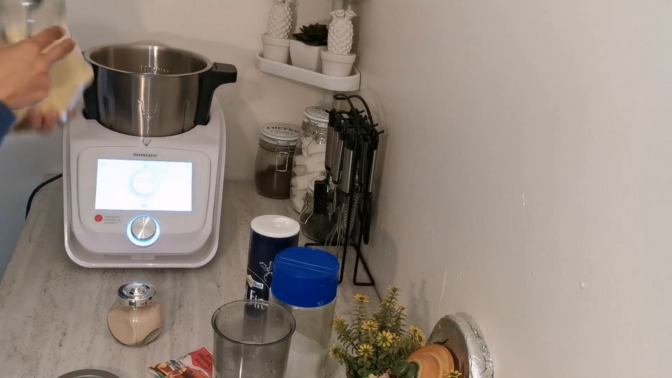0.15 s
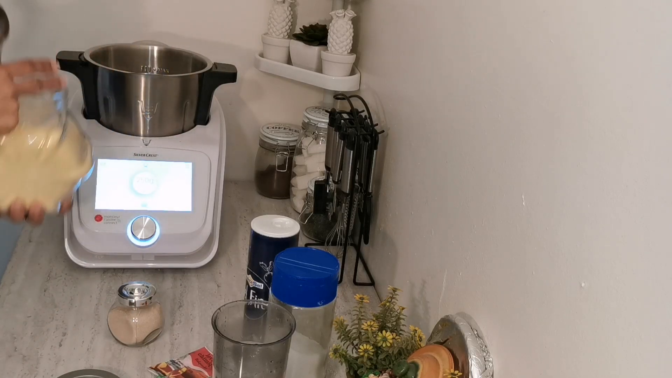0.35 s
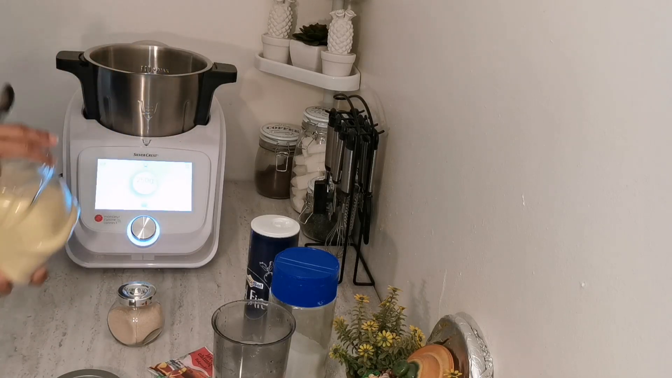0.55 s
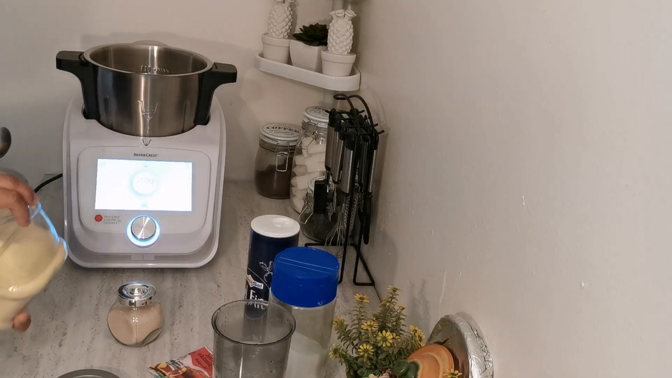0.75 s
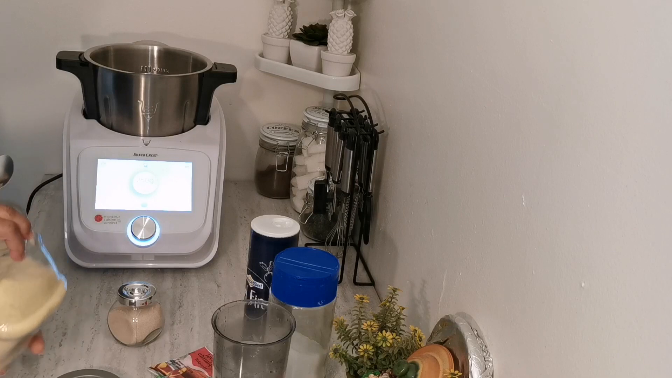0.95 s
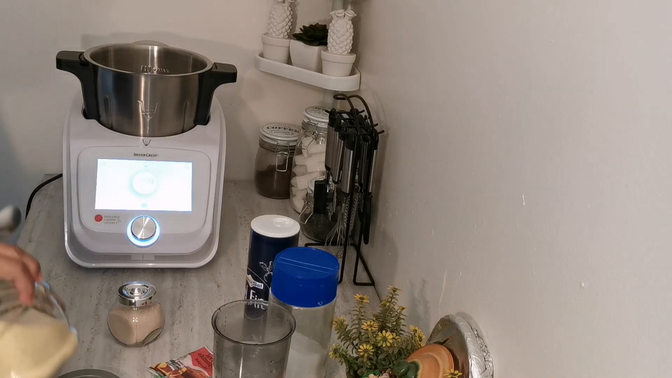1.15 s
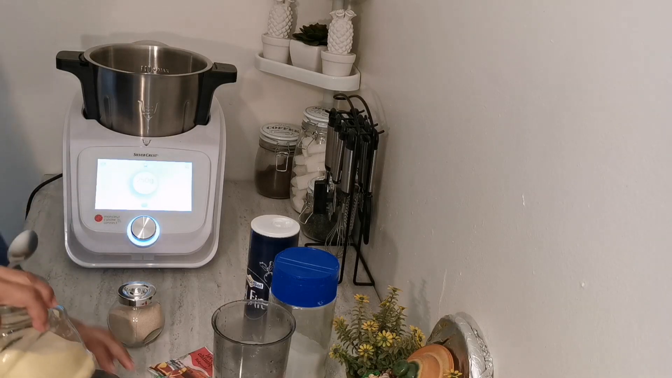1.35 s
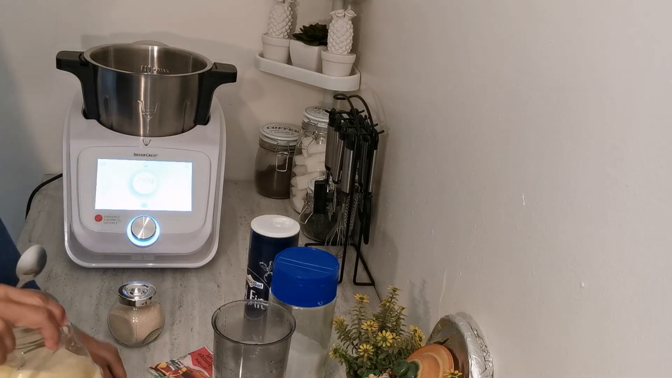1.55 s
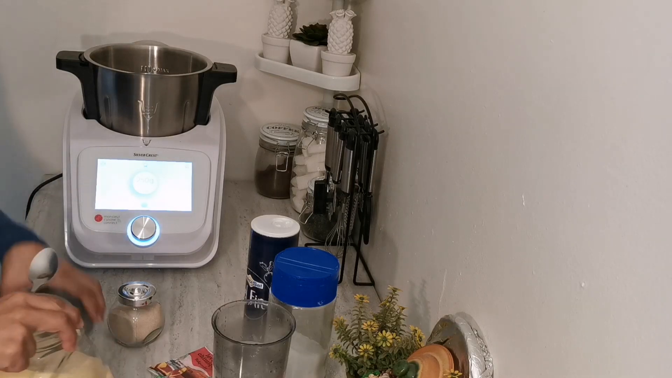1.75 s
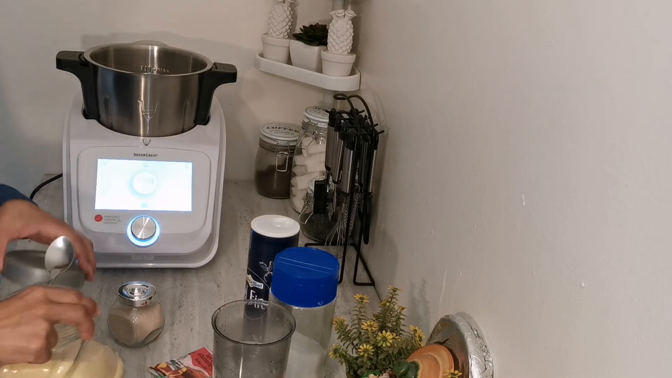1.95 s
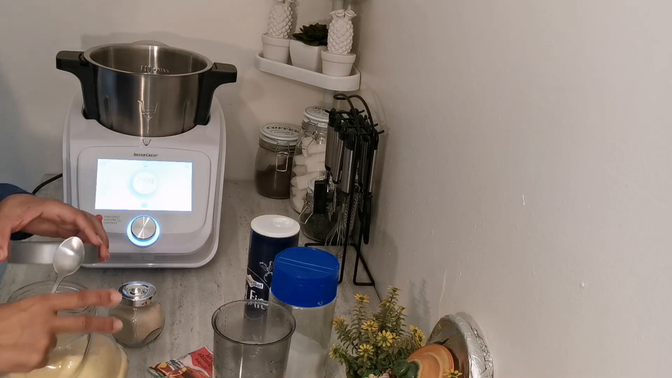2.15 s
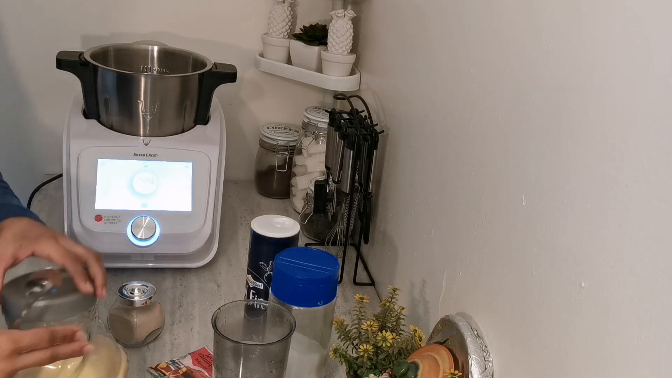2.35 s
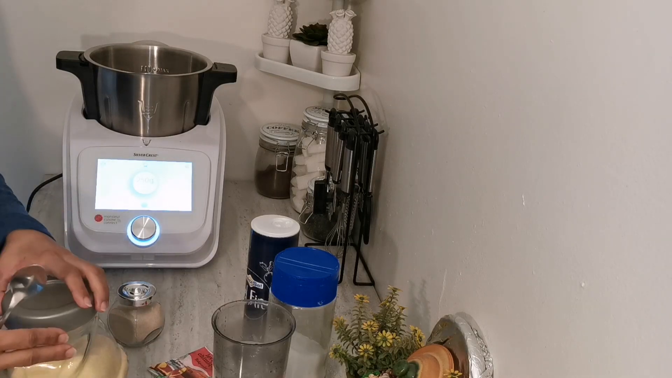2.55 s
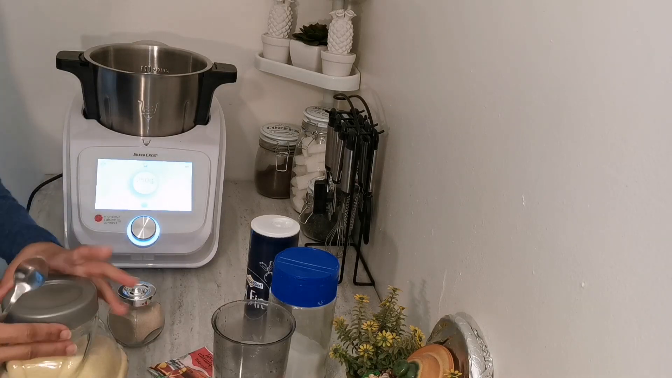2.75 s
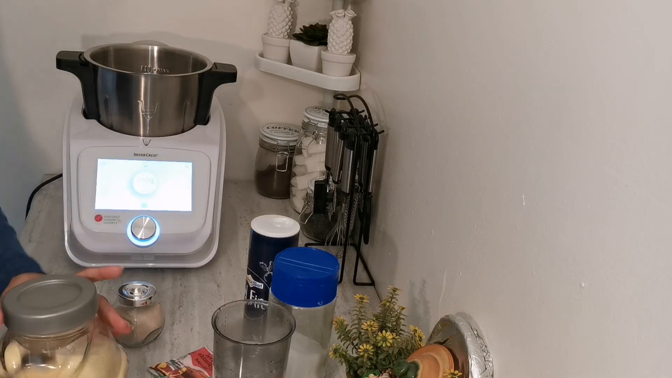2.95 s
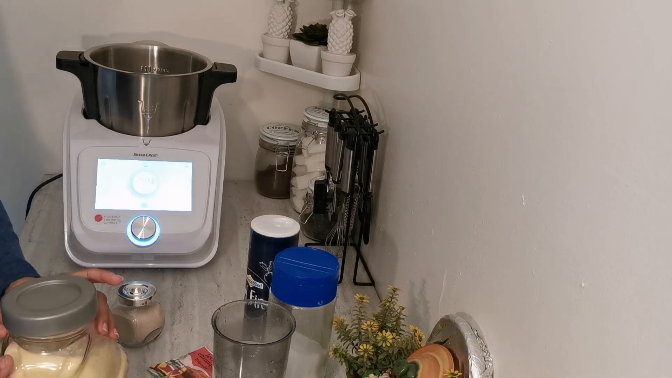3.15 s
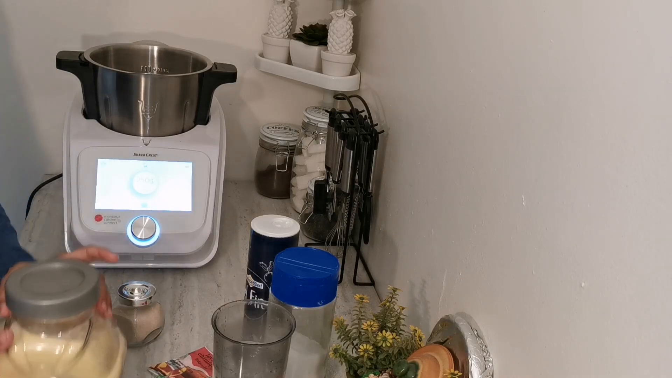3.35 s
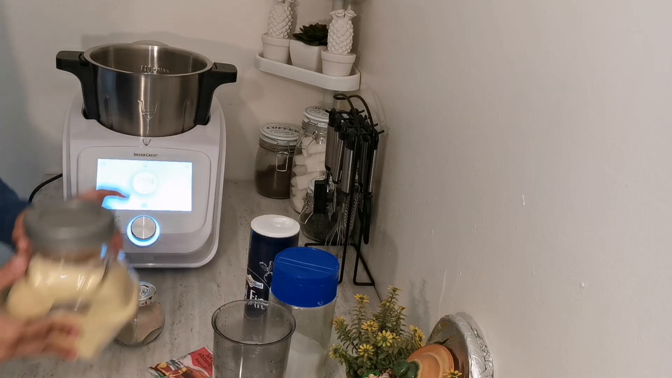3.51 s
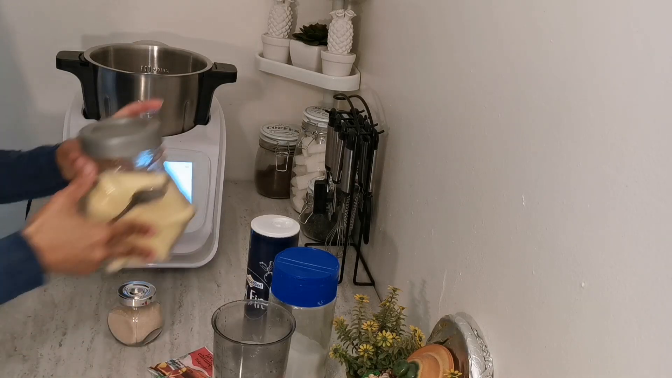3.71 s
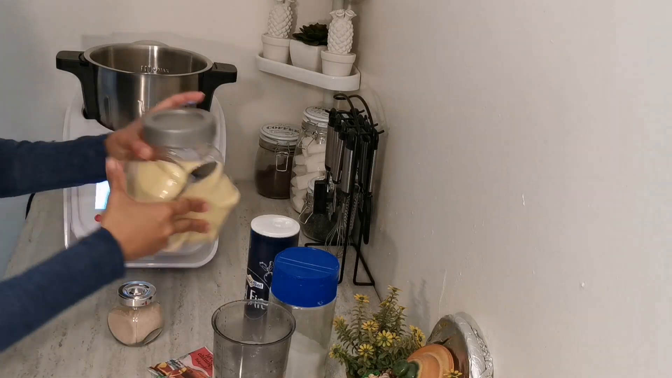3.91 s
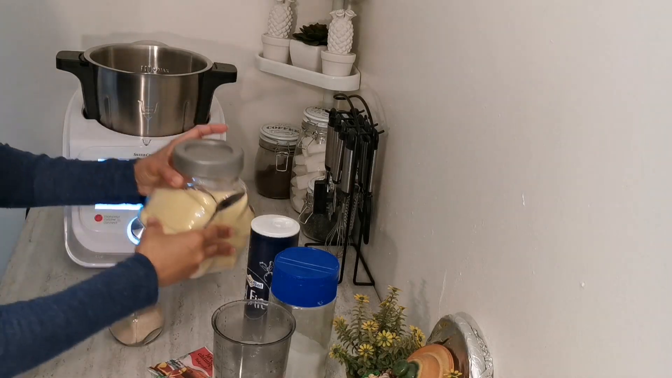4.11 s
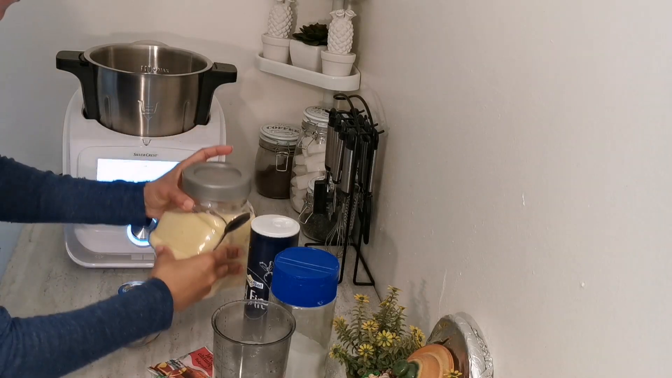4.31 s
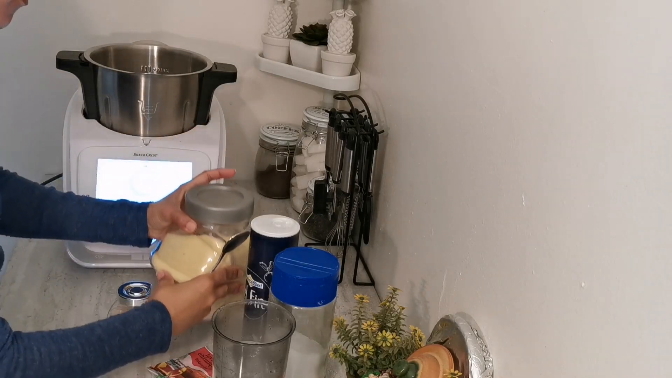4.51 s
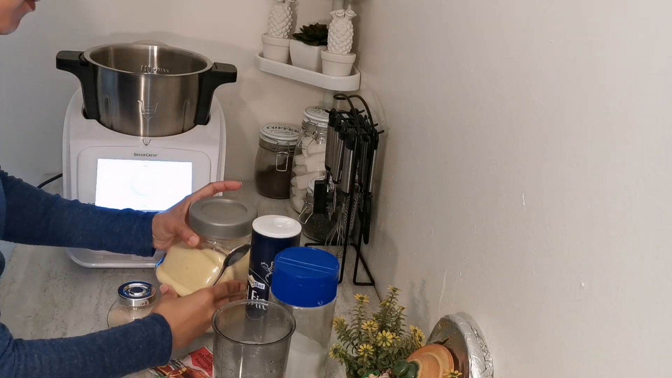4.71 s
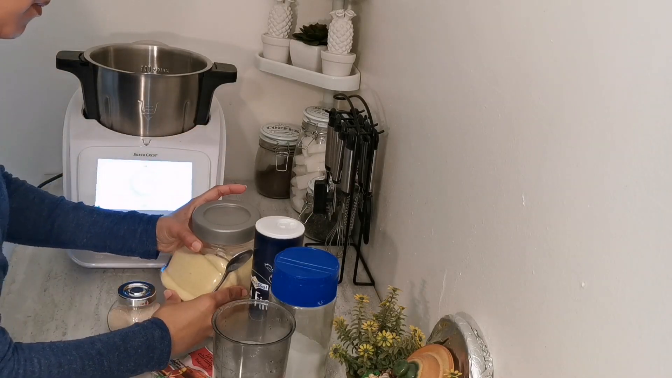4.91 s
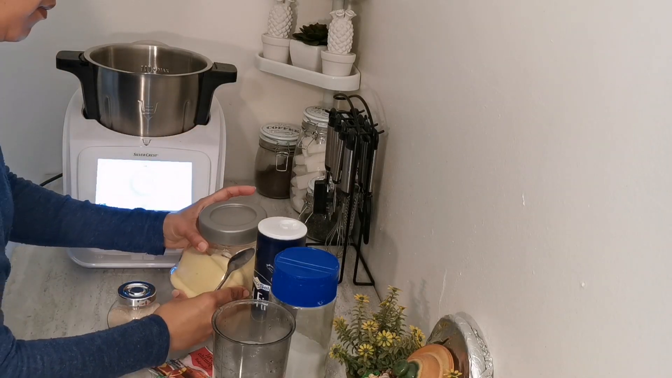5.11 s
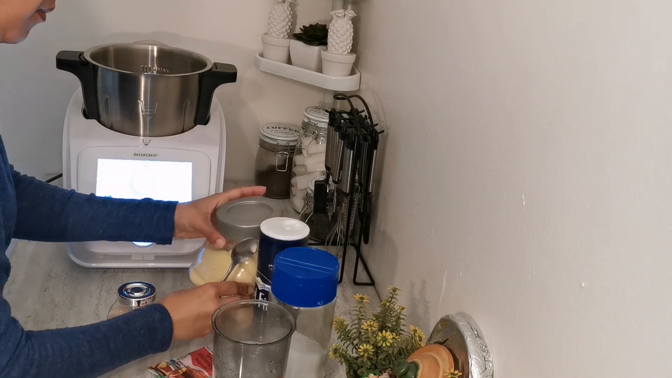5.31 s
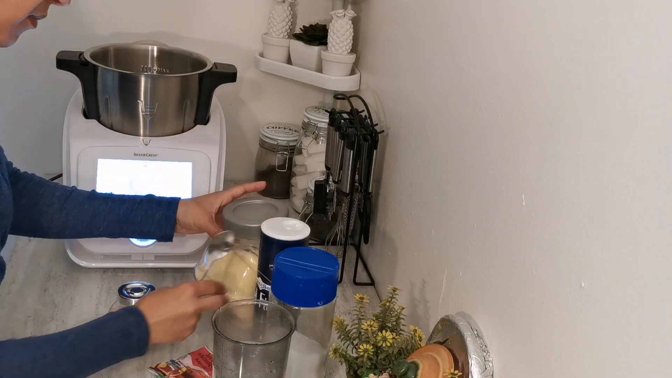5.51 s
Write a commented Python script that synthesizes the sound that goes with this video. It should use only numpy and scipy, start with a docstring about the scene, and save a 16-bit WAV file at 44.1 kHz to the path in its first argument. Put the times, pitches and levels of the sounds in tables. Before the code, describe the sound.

A spoon clinks lightly on a glass jar, then a thin lid taps against the rim. The heavy jar lands on the worktop with dull thuds, rocks and scrapes, amid more spoon and lid clicks. After a lull with faint sleeve rustle, the jar is set down again with a firm knock and slid along. Appliances hum softly throughout the small, slightly ringing kitchen, and the handling sounds nearby, a little to the left.

```python
"""Glass jar on a kitchen worktop.

A heavy jar is set down, rocked, slid and leant on: blows ring the worktop's modes, friction rumbles
and hisses. The lid taps the rim; a spoon clinks on glass and lid. The small tiled kitchen rings briefly.
Appliances hum throughout; sleeves rustle faintly while the jar is carried."""
import sys
import numpy as np
from scipy import signal
from scipy.fft import rfft, irfft, next_fast_len
from scipy.io import wavfile
from scipy.ndimage import map_coordinates

SR = 44100
rng = np.random.default_rng(int(sys.argv[2]) if len(sys.argv) > 2 else 0)


def int16_out(signal):
    """Quantize to a 16-bit WAV file."""
    q = np.round(np.clip(np.atleast_2d(signal).T, -1, 1) * 32767)
    wavfile.write(sys.argv[1], SR, q.astype(np.int16))


N = 245637

# kitchen reverberation (frequency [Hz], t60 [s], relative level [dB])
ROOM_BANDS = [(60, 0.65, -14), (225, 0.33, -6.5), (577, 0.35, -4.5), (1520, 0.42, 1.5), (4000, 0.41, 0),
              (12000, 0.35, -5.5)]
# diffuse sound (frequency [Hz], left-right correlation [1])
COHERENCE = [(60, 0.77), (250, 0.79), (600, 0.29), (1500, 0.033), (5000, 0.053)]
# room tone spectra (frequency [Hz], relative density [dB])
APPLIANCE_SPECTRUM = [(12, -31.5), (20, -1), (75, -5.5), (108, 1), (150, -6.5), (168, -10.5), (204, -6),
                      (274, -16.5), (298, -11.5), (434, -32), (511, -42), (612, -31), (1000, -37),
                      (1300, -32.5), (2200, -120)]
HISS_SPECTRUM = [(240, -29.5), (400, -12), (519, -4), (568, -10.5), (748, -9), (820, -7), (1130, -15.5),
                 (1680, -10.5), (2180, -13), (2350, -15), (4900, -18.5), (7190, -26), (15400, -28)]

# spoon on glass, then on lid (time [s], blow [dB], chatter re blow [dB])
SPOON_CLINKS = [(0.7212, -38, 6.5), (2.263, -41, 18.5)]
# modes rung by the spoon (frequency [Hz], level [dB], t60 [s])
GLASS_MODES = [(618, -16, 0.071), (1475, -18, 0.033), (2154, -15, 0.042), (2290, -21, 0.023),
               (2850, -14, 0.035), (3410, -6.5, 0.029), (4404, 0.5, 0.045), (4330, -1, 0.044),
               (4400, -23, 0.045), (4710, -1.5, 0.036), (4980, 2.5, 0.025), (5740, -6, 0.023),
               (8170, -14, 0.027), (8310, -1, 0.069), (10730, -15, 0.033)]
STEEL_MODES = [(2040, -16, 0.018), (3400, 4, 0.0059), (4080, -7, 0.015), (4720, -1, 0.03), (5160, 1, 0.06),
               (5270, -4, 0.037), (6460, -12, 0.024), (8110, -1, 0.025), (9060, -3, 0.014),
               (10940, 3.5, 0.038), (12200, -16, .02), (14400, -11, .015)]
# spoon chatter (frequency [Hz], relative density [dB])
GLASS_CHATTER_SPECTRUM = [(180, -49), (300, -7), (1260, -16), (1560, -31), (1840, -23), (2780, -3),
                          (3930, -16), (4790, -2.5), (7110, -9.5), (8110, -2), (9890, -21), (10900, -11),
                          (12900, -9.5), (15400, -34.5)]
STEEL_CHATTER_SPECTRUM = [(1060, -18), (1800, -18), (2190, -7.5), (3470, -12), (3860, -16), (4880, -5),
                          (6000, -11), (8450, -3.5), (9930, -10), (11000, -6.5), (12900, -13),
                          (14300, -13.5), (15400, -46)]

# lid on rim (time [s], blow [dB], tilt [dB/octave], click re blow [dB])
LID_TAPS = [(1.569, -57, -22, -4.5), (1.59, -51, -0.5, -43), (1.6795, -30, 10, -9.5),
            (1.692, -54, -5.5, -13), (1.707, -41, 16, 3.5), (1.734, -59, 9, -12), (2.512, -65.5, -2, 18.5),
            (2.542, -42.5, -7.5, 4), (2.557, -45, 16.5, 10), (2.665, -67, -18, 17), (2.848, -54, -14, -0.5)]
# lid modes (frequency [Hz], level [dB], t60 [s])
LID_MODES = [(598, -14.5, 0.12), (776, -10.5, 0.13), (872, -6, 0.07), (922.5, -5.5, 0.17),
             (965, -2.5, 0.085), (1067, -15.5, 0.12), (1360, -3.5, 0.026), (1820, -16.5, 0.033),
             (2020, -25, 0.0057), (2136, -16.5, 0.022), (2370, -16, 0.017), (2532, -14, 0.021)]
# lid click on glass (frequency [Hz], relative density [dB])
LID_CLICK_SPECTRUM = [(800, -23), (1500, 5.5), (2500, 0), (4000, -3), (5200, -5), (6500, -14.5), (8400, -6),
                      (11000, -14.5), (14000, -23), (16000, -77)]

# jar lands or rocks (time [s], blow [dB], boom re blow [dB], knock re blow [dB], click re blow [dB])
JAR_THUDS = [(1.887, -16, -10, -13.5, -11), (1.981, -30, -6.5, -26, -38), (2.110, -16.5, -5.5, -16, -51),
             (2.543, -35.5, -22, -23, -3), (2.565, -26.5, -12.5, -40, -8.5), (2.591, -44, 5.5, -6, -4),
             (2.660, -30, -13.5, -8.5, -15.5), (2.69, -44.5, -19, -4, -23), (2.846, -36, -8.5, -27.5, -36),
             (2.963, -45, -0.5, -42, -29), (4.874, -13, -3, -6.5, -11.5), (4.883, -18.5, -5.5, -10, -13.5),
             (4.925, -33.5, -14, -14.5, -14), (5.137, -22, -1, -7, -23), (5.156, -38.5, 16.5, -23, -39),
             (5.366, -24, 0, -14, -42), (5.418, -34.5, 0, -10, -30)]
# worktop modes (frequency [Hz], level [dB], t60 [s])
WORKTOP_MODES = [(61.1, -7.5, 0.24), (83.4, 1, 0.12), (97.8, -3.5, 0.43), (118, -2.5, 0.19),
                 (148.3, -6.5, 0.34), (176, -6, .15), (248, -6.5, 0.051), (253.8, -7, 0.13),
                 (271.5, 7, 0.031), (308, 0, 0.055), (312, 1, 0.026), (343.7, -1, 0.0527),
                 (391, -4.5, 0.033), (482.4, -5.5, 0.041), (502, -2, 0.05), (588, 1.5, 0.053),
                 (625, -4, 0.2), (748, 0.5, 0.056), (888, 5, 0.03), (970, 4, 0.042), (1073, 8.5, 0.02),
                 (1280, -17, 0.043), (1435, 3, 0.023), (1521, -7.5, 0.029), (1750, -9.5, 0.024),
                 (1980, -2.5, 0.018), (2290, -24.5, .02)]
# hard contact of the jar's edge (frequency [Hz], relative density [dB])
EDGE_SPECTRUM = [(600, 0), (1500, -5.5), (2500, -9.5), (4000, -17), (5200, -26), (6500, -34), (8400, -26.5),
                 (11000, -49), (14000, -44.5), (16000, -93)]
# jar position (time [s], left minus right [dB])
JAR_PATH = [(2.9, -1.4), (4.9, -4.5)]
# base drags (peak time [s], 20 dB swell [s], 20 dB fade [s], rumble [dB], hiss [dB])
JAR_SLIDES = [(1.93, 0.027, 0.19, -31.5, -59), (2.17, 0.27, 0.16, -34.5, -50), (2.6, 0.11, 0.088, -42, -52),
              (2.7, 0.064, 0.091, -44, -77), (2.96, 0.17, 0.078, -54.5, -71),
              (4.91, 0.034, 0.21, -53, -49.5), (5.08, 0.086, 0.84, -40.5, -61.5), (5.4, .2, 0.25, -42, -51),
              (5.48, 0.22, 0.14, -45, -46)]
# friction hiss (frequency [Hz], relative density [dB])
GRIT_SPECTRUM = [(290, -31), (500, -25), (657, 3), (981, -11.5), (1150, -11), (1350, -13.5), (1550, -11.5),
                 (4690, -18.5), (6250, -32), (8330, -23), (15400, -49)]
# hand leans on the jar (time [s], push [dB])
HAND_PRESSES = [(2.93, -52), (3.12, -55)]
# mode excitation by a soft push (frequency [Hz], gain [dB])
PRESS_COLOUR = [(70, 0), (130, -6), (260, -30)]

# sleeves and fingers brush (peak time [s], 20 dB swell [s], 20 dB fade [s], dull [dB], bright [dB])
SLEEVE_STROKES = [(3.2, 0.09, .15, -89, -85), (3.35, 0.065, 0.1, -62.5, -81), (3.68, 0.12, 0.53, -79, -89),
                  (3.85, 0.056, 0.22, -74.5, -93), (4.0, .1, .6, -78.5, -90),
                  (4.35, .3, 0.13, -81.5, -77.5), (4.8, 0.19, 0.042, -75, -83)]
# rustle spectra (frequency [Hz], relative density [dB])
DULL_SPECTRUM = [(300, -46), (500, 3.5), (1300, -5), (3000, -11), (5000, -19), (7000, -88)]
BRIGHT_SPECTRUM = [(2500, -45), (5000, -20), (8500, 10.5), (13000, -9), (15500, -36)]

APPLIANCE_DB, HISS_DB, CREEP_DB_PER_S = -63, -75, 0.58
FAN_HZ, FAN_WIDTH_HZ, FAN_DB = 1715, 70, -86
BOOM_HZ, BODY_HZ, KNOCK_HZ = 113.5, (210, 445), 660  # corners of a thud's colour
LEFT_LAG_SAMPLES, PREDELAY_SAMPLES = 9, 180
BASS_CUT_HZ, TOP_HZ = 45.4, 15650


def amp(db):
    return 10 ** (np.asarray(db) / 20)


def unit_rms(x):
    return x / np.sqrt(np.mean(x ** 2) + 1e-20)


def curve_at(points, hz):
    """Interpolate (frequency [Hz], value) points on a log axis."""
    knots_hz, values = np.transpose(points)
    return np.interp(np.log(hz + 1), np.log(knots_hz + 1), values)


def wobble(rate_hz):
    """Smooth random curve."""
    knots = rng.standard_normal(int(N * rate_hz / SR) + 4)
    return map_coordinates(knots, [np.arange(N) * rate_hz / SR])


def filtered(x, response):
    """Apply a complex frequency response."""
    n = x.shape[-1]
    n_fft = next_fast_len(n + 8192)
    return irfft(rfft(x, n_fft) * response(np.fft.rfftfreq(n_fft, 1 / SR)), n_fft)[..., :n]


def diffuse(pair, spectrum):
    """Two independent noises to coloured stereo, correlated in the bass."""
    def response(hz):
        angle = np.arccos(np.clip(curve_at(COHERENCE, hz), -1, 1)) / 2
        return amp(curve_at(spectrum, hz)) * [np.cos(angle), np.sin(angle)]
    mid, side = filtered(pair, response)
    return unit_rms(np.array([mid + side, mid - side]))


def resonances(peaks):
    """Causal response of (frequency [Hz], width [Hz], level [dB]) peaks, alternating in sign."""
    return lambda hz: sum((-1) ** k * amp(db) * 1j * hz * width / (f0 ** 2 - hz ** 2 + 1j * hz * width)
                          for k, (f0, width, db) in enumerate(peaks))


def ringing(modes, colour, scatter_db, contact_s):
    """Damped modes, swelling during contact, coloured by the blow."""
    hz, db, t60_s = np.transpose(modes)[:, :, None]
    t = np.arange(SR // 2) / SR
    level_db = db + curve_at(colour, hz) + scatter_db * rng.standard_normal(hz.shape)
    onset = (1 - np.exp(-t / contact_s)) ** 2
    return onset * np.sum(amp(level_db - 60 * t / t60_s) * np.sin(2 * np.pi * hz * t), axis=0)


def contact_noise(peak_db, spectrum, t60_s):
    """Short burst; minimum phase, so nothing precedes the touch."""
    n = SR // 2
    t = np.arange(n) / SR
    cepstrum = irfft(np.log(amp(curve_at(spectrum, np.fft.rfftfreq(n, 1 / SR))) + 1e-6))
    cepstrum[1:n // 2] *= 2
    cepstrum[n // 2 + 1:] = 0
    noise = amp(-60 * t / t60_s) * rng.standard_normal(n)
    burst = irfft(rfft(noise) * np.exp(rfft(cepstrum)))
    return amp(peak_db) * burst / np.abs(burst).max()


def add_in_kitchen(out, time_s, sound, room_db, pan_db):
    """Mix in a sound and its reverberation; decay varies with frequency."""
    n = SR // 2
    decay, colour = [row[:2] for row in ROOM_BANDS], [row[::2] for row in ROOM_BANDS]
    hz, t, bands = signal.stft(rng.standard_normal((2, n)), SR, nperseg=256)
    t60_s = curve_at(decay, hz)[:, None]
    tail = signal.istft(bands * amp(-60 * t / t60_s), SR, nperseg=256)[1][:, :n]
    tail *= 1 + 0.99 * np.exp(-np.arange(n) / SR / 0.0075)  # near tiles: first and strongest
    impulse = np.pad(diffuse(tail, colour) / np.sqrt(n), ((0, 0), (PREDELAY_SAMPLES, 0)))
    impulse[0, LEFT_LAG_SAMPLES] = impulse[1, 0] = amp(-room_db)  # direct path
    wet = signal.fftconvolve(sound[None], impulse, axes=1) * amp([[pan_db / 2], [-pan_db / 2]])
    # normalise to direct plus reverberant energy
    power = np.abs(rfft(sound)) ** 2
    centroid_hz = np.average(np.fft.rfftfreq(len(sound), 1 / SR), weights=power)
    energy_gain = 2 + 2 * amp(2 * room_db + curve_at(colour, centroid_hz))
    wet *= np.linalg.norm(sound) * np.sqrt(energy_gain) / np.linalg.norm(wet)
    out[:, round(time_s * SR):][:, :SR] += wet[:, :SR]


def stroke_gains(rows):
    """One envelope per level column; each stroke swells, then fades."""
    peak_s, swell_s, fade_s, *levels_db = np.transpose(rows)[:, :, None]
    t = np.arange(N) / SR - peak_s
    shape_db = -20 * np.where(t < 0, -t / swell_s, t / fade_s)
    return [np.sqrt(np.sum(amp(2 * (db + shape_db)), axis=0)) for db in levels_db]


def jar_pan_db(time_s):
    return np.interp(time_s, *np.transpose(JAR_PATH))


def appliance_hum():
    """Rumble and hiss creep up; a fan adds a steady narrow band."""
    creep_db = CREEP_DB_PER_S * np.arange(N) / SR
    sway = amp(1.1 * wobble(7))
    rumble = sway * diffuse(rng.standard_normal((2, N)), APPLIANCE_SPECTRUM)
    fan = filtered(rng.standard_normal((2, N)), lambda hz: np.exp(-((hz - FAN_HZ) / FAN_WIDTH_HZ) ** 2))
    hiss = diffuse(rng.standard_normal((2, N)), HISS_SPECTRUM)
    return amp(creep_db) * (amp(APPLIANCE_DB) * rumble + amp(HISS_DB) * hiss) + amp(FAN_DB) * unit_rms(fan)


def spoon_clinks():
    """Brief chatter over the struck object's modes."""
    out = np.zeros((2, N + SR))
    targets = (GLASS_MODES, GLASS_CHATTER_SPECTRUM), (STEEL_MODES, STEEL_CHATTER_SPECTRUM)
    for (time_s, db, chatter_db), (modes, spectrum) in zip(SPOON_CLINKS, targets):
        ring = ringing(modes, colour=[(20, 0)], scatter_db=2.0, contact_s=0.00054)
        chatter = contact_noise(chatter_db, spectrum, t60_s=0.021)
        add_in_kitchen(out, time_s, amp(db) * (ring + chatter), room_db=5, pan_db=-2)
    return out[:, :N]


def lid_taps():
    """The thin lid clicks on the glass rim and rings."""
    out = np.zeros((2, N + SR))
    for time_s, db, tilt_db, click_db in LID_TAPS:
        colour = [(500, -tilt_db), (2000, tilt_db)]
        ring = ringing(LID_MODES, colour, scatter_db=0.3, contact_s=0.00067)
        click = contact_noise(click_db, LID_CLICK_SPECTRUM, t60_s=0.011)
        add_in_kitchen(out, time_s, amp(db) * (ring + click), room_db=6.5, pan_db=-1.5)
    return out[:, :N]


def jar_thuds():
    """Each landing rings the worktop; a harder edge gives more knock and click."""
    out = np.zeros((2, N + SR))
    for time_s, db, boom_db, knock_db, click_db in JAR_THUDS:
        colour = [(BOOM_HZ, boom_db), *((hz, 0) for hz in BODY_HZ), (KNOCK_HZ, knock_db)]
        wood = ringing(WORKTOP_MODES, colour, scatter_db=3.5, contact_s=0.0024)
        click = contact_noise(click_db, EDGE_SPECTRUM, t60_s=0.034)
        add_in_kitchen(out, time_s, amp(db) * (click - wood), room_db=-0.5, pan_db=jar_pan_db(time_s))
    return out[:, :N]


def jar_slides():
    """Uneven friction shakes the worktop's lower modes and hisses."""
    rumble_gain, hiss_gain = stroke_gains(JAR_SLIDES)
    worktop = resonances([(hz, 2.94 / t60_s + 12, db - 6.17 * np.log2(hz / 97))
                          for hz, db, t60_s in WORKTOP_MODES])
    friction = amp(4.8 * wobble(32)) * rng.standard_normal(N)
    drag = filtered(friction, lambda hz: 1 / (1 + (hz / 900) ** 4))
    rumble = unit_rms(filtered(drag, worktop))
    hiss = diffuse(amp(0.83 * wobble(320)) * rng.standard_normal((2, N)), GRIT_SPECTRUM)
    pan = amp(np.outer([.5, -.5], jar_pan_db(np.arange(N) / SR)))
    return (rumble_gain * rumble + hiss_gain * hiss) * pan


def hand_presses():
    """A soft push stirs only the worktop's lowest modes."""
    out = np.zeros((2, N + SR))
    for time_s, db in HAND_PRESSES:
        boom = ringing(WORKTOP_MODES, PRESS_COLOUR, scatter_db=5.0, contact_s=0.02)
        add_in_kitchen(out, time_s, amp(db) * boom, room_db=-2.5, pan_db=jar_pan_db(time_s))
    return out[:, :N]


def sleeve_rustle():
    """Cloth and skin brush: fluttering noise in two bands."""
    dull_gain, bright_gain = stroke_gains(SLEEVE_STROKES)
    cloth = amp(0.88 * wobble(34)) * rng.standard_normal((2, 2, N))
    return dull_gain * diffuse(cloth[0], DULL_SPECTRUM) + bright_gain * diffuse(cloth[1], BRIGHT_SPECTRUM)


def scene():
    handling = jar_thuds() + hand_presses() + jar_slides()
    bass_cut = signal.butter(4, BASS_CUT_HZ, "high", fs=SR, output="sos")
    handling = signal.sosfilt(bass_cut, handling)  # high-pass: no deep bass in thuds, presses, slides
    return handling + lid_taps() + spoon_clinks() + sleeve_rustle() + appliance_hum()


def record(dry):
    """Brick-wall low-pass."""
    return filtered(dry, lambda hz: hz < TOP_HZ)


dry = scene()
out = record(dry)
int16_out(out)
```